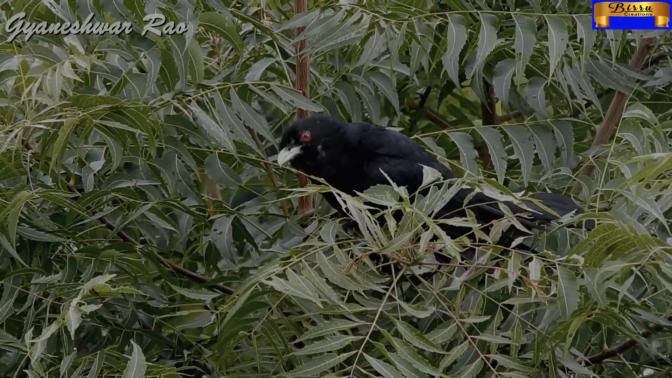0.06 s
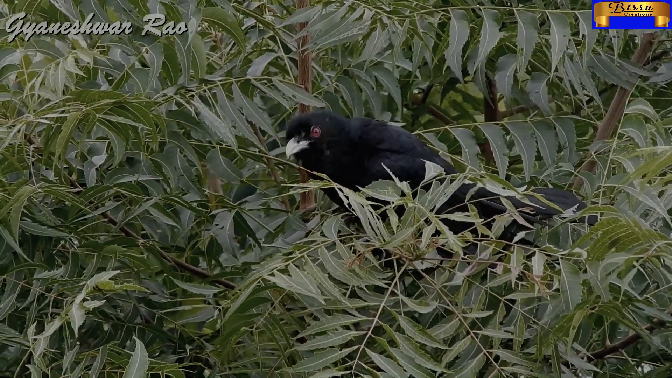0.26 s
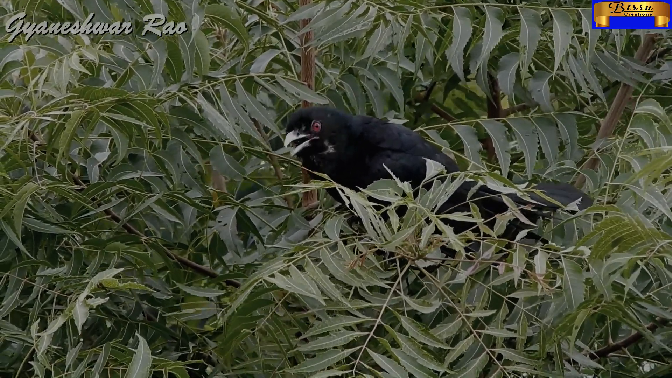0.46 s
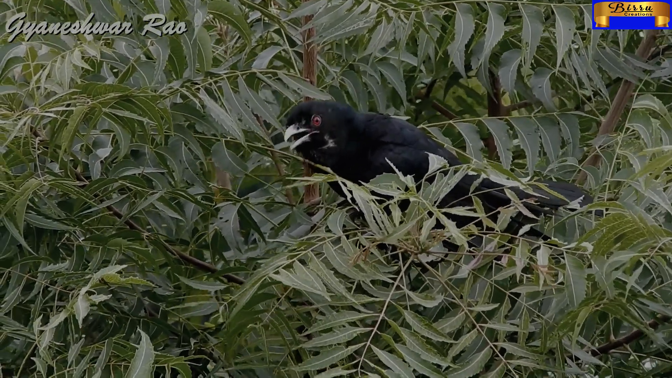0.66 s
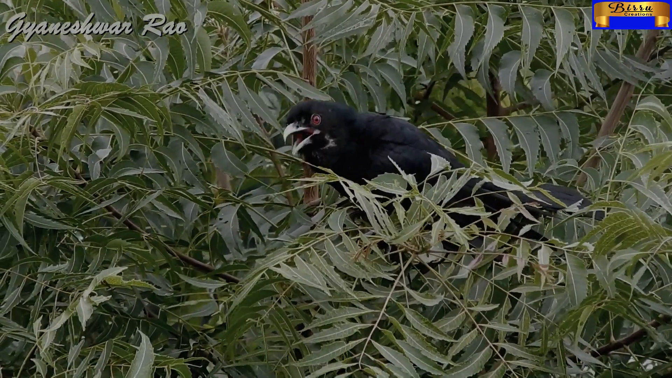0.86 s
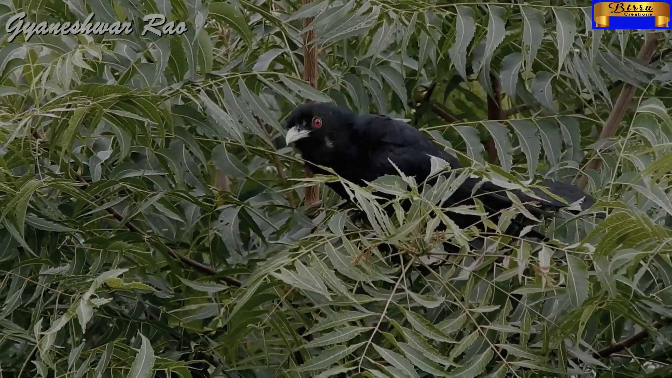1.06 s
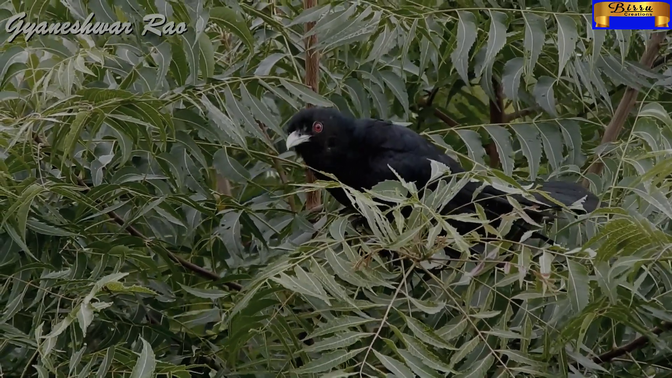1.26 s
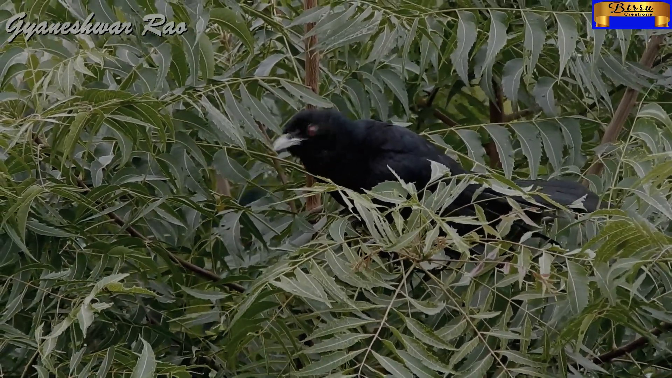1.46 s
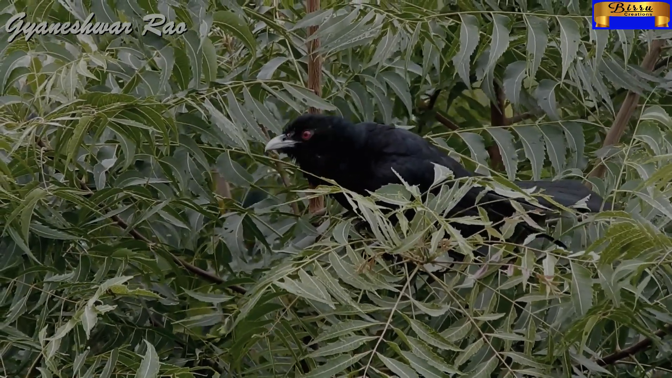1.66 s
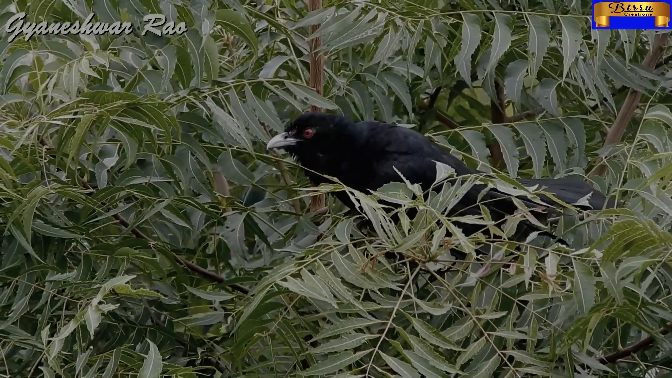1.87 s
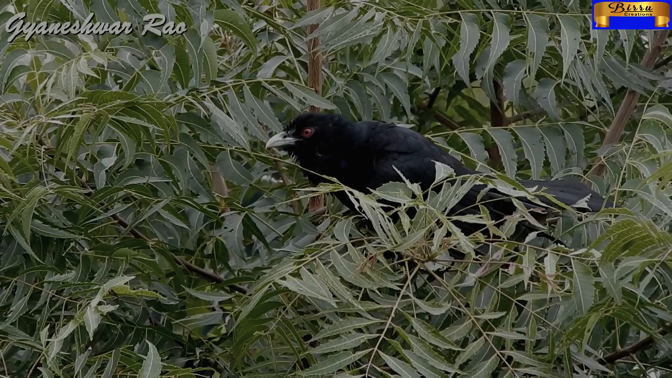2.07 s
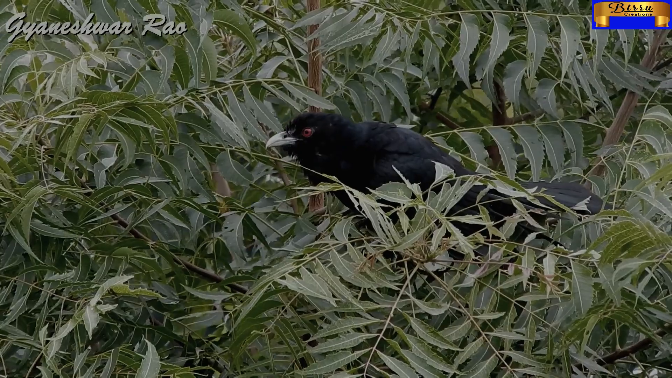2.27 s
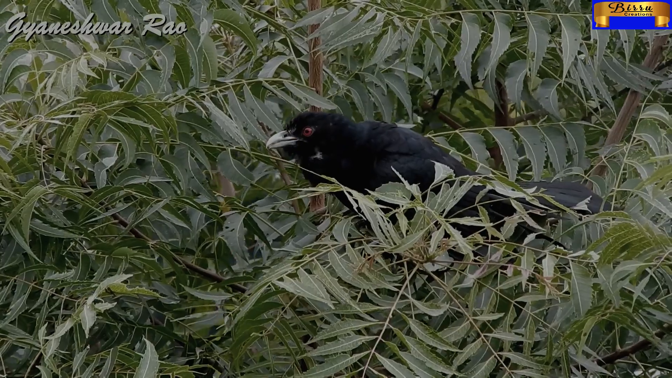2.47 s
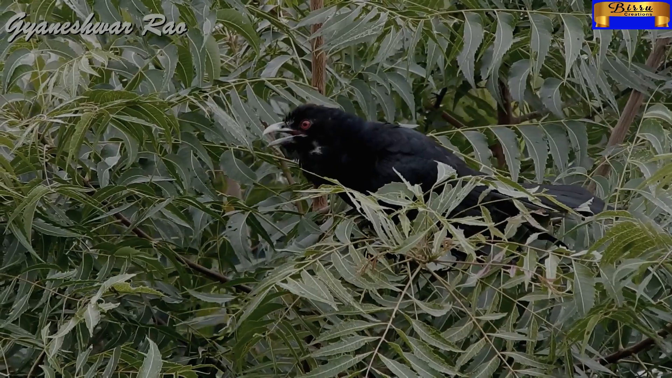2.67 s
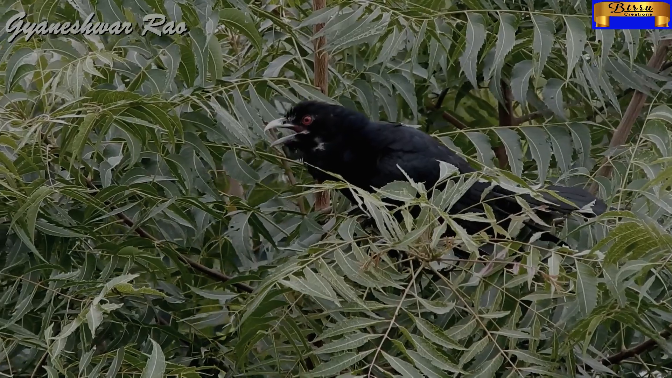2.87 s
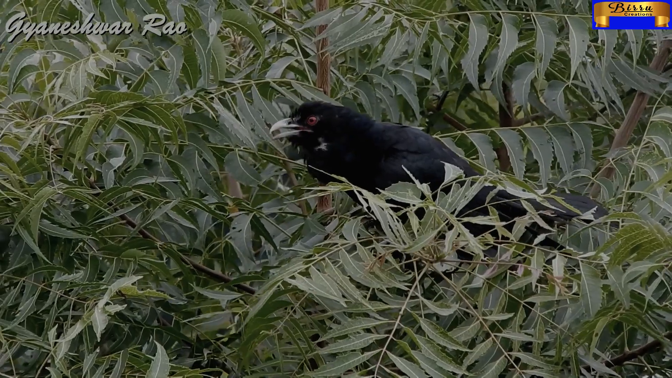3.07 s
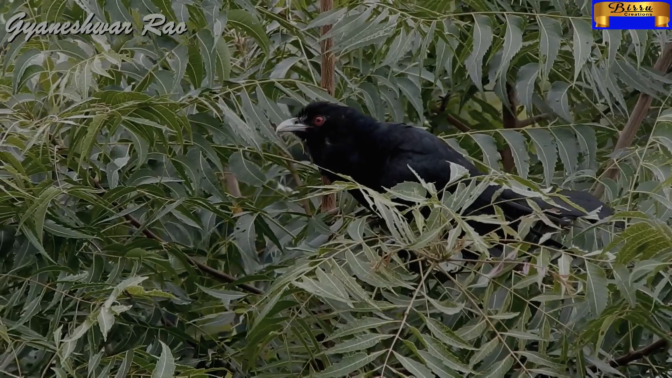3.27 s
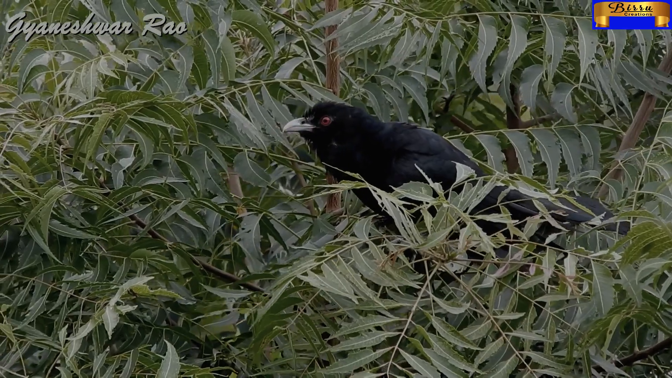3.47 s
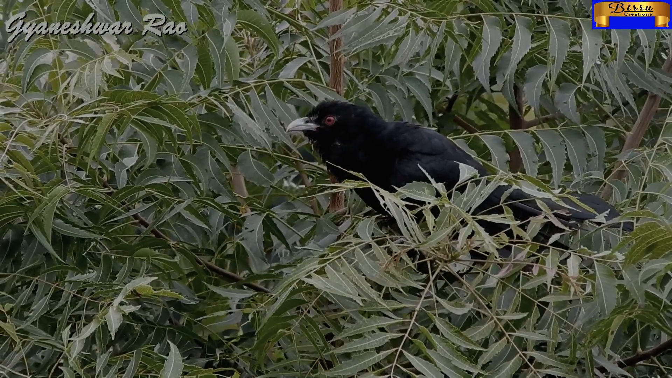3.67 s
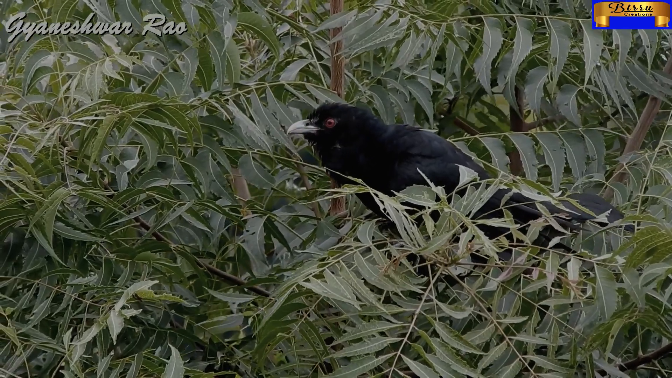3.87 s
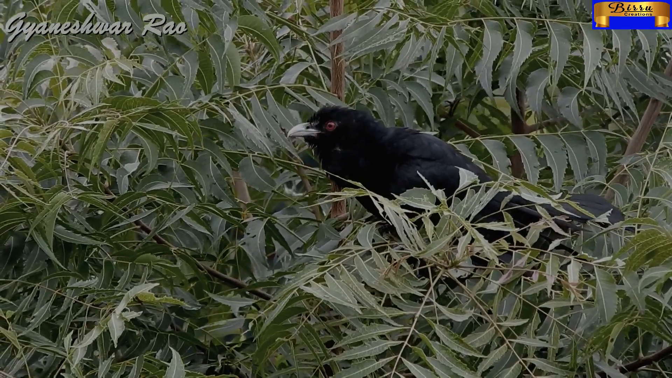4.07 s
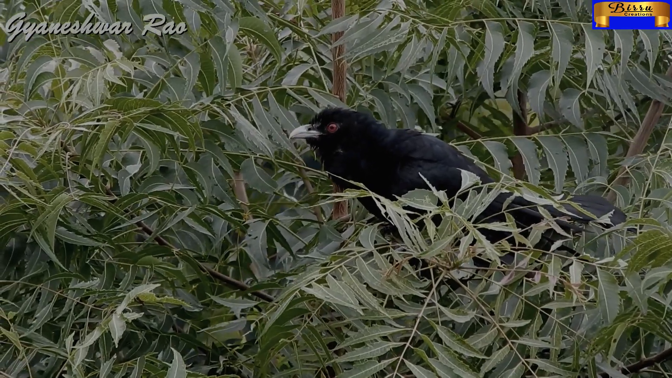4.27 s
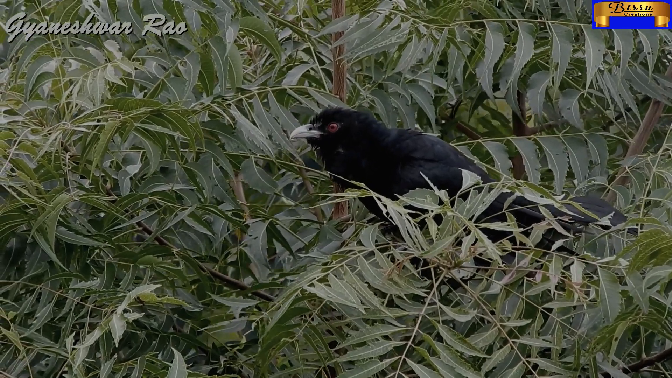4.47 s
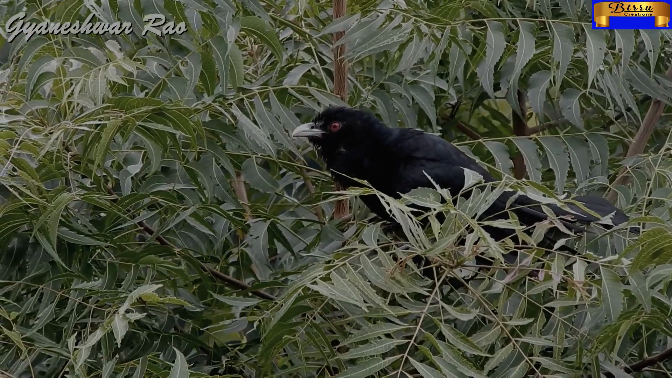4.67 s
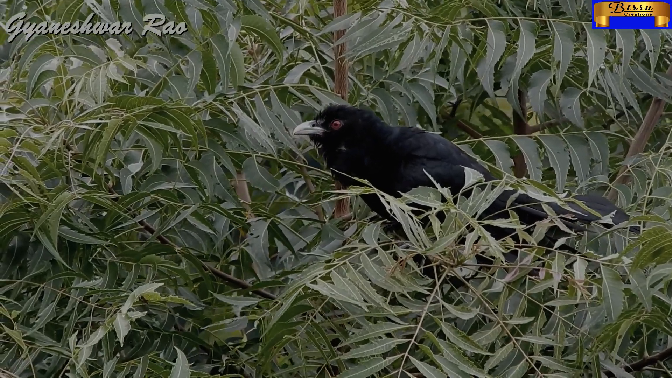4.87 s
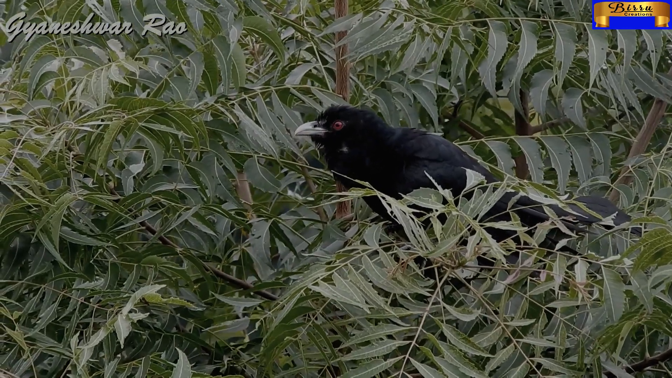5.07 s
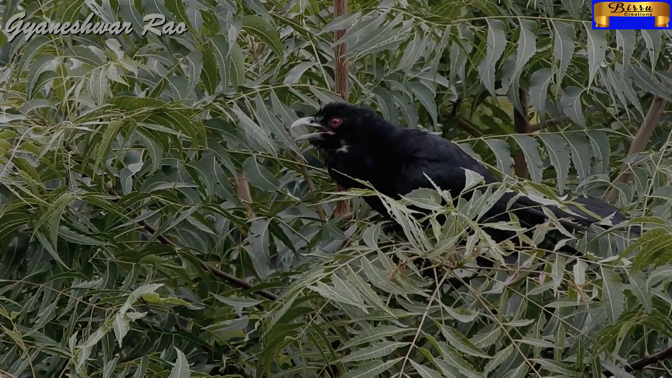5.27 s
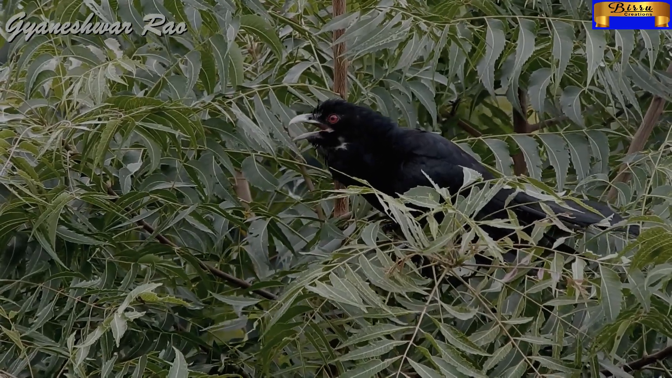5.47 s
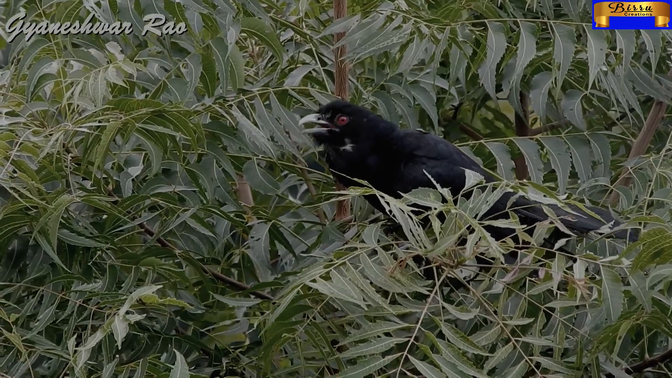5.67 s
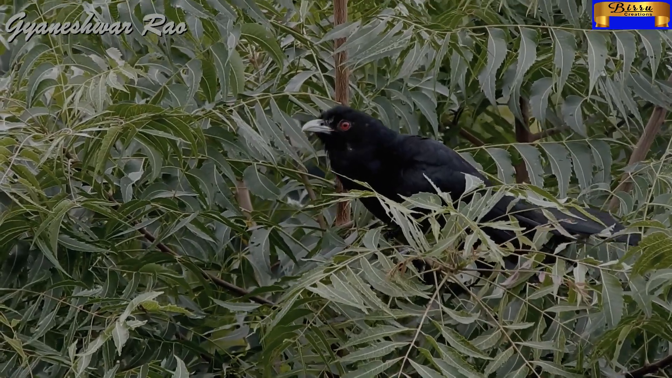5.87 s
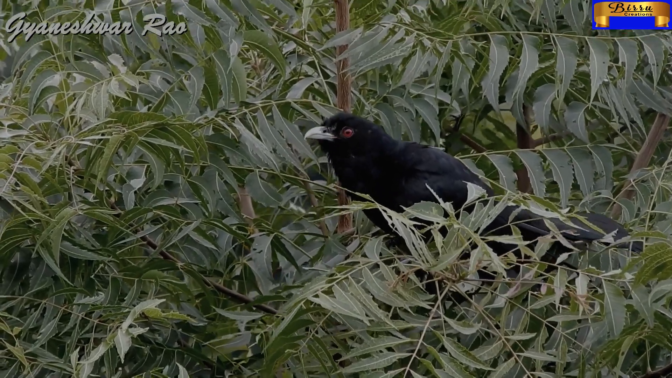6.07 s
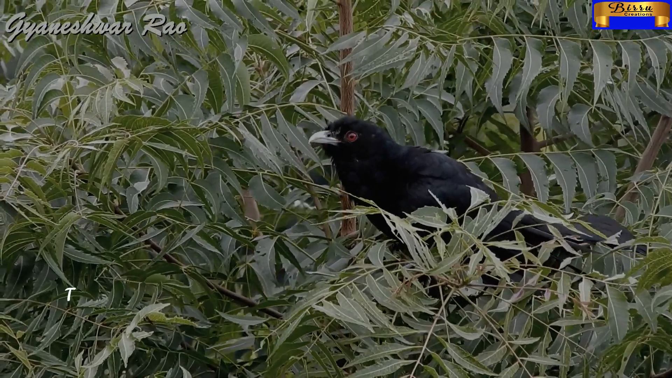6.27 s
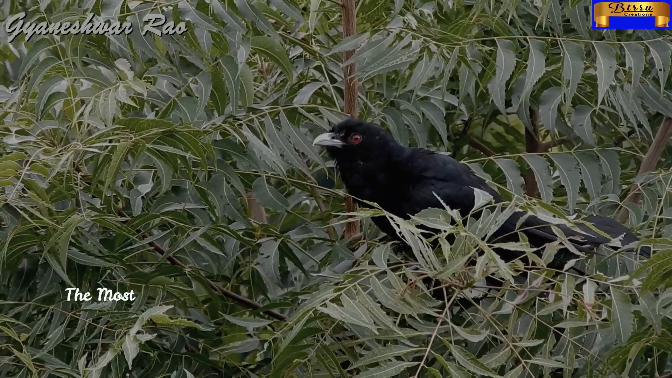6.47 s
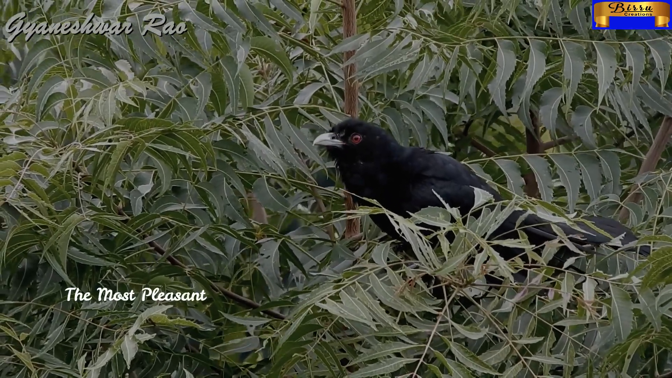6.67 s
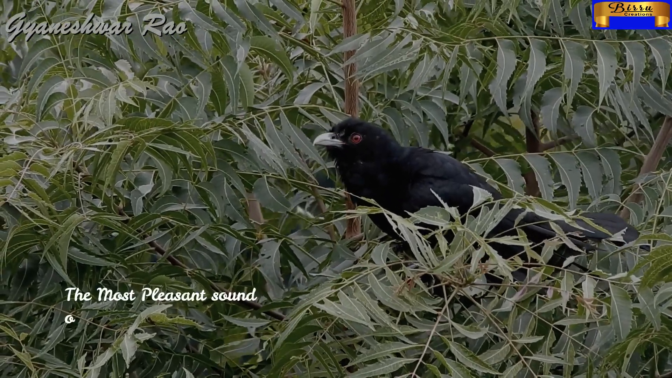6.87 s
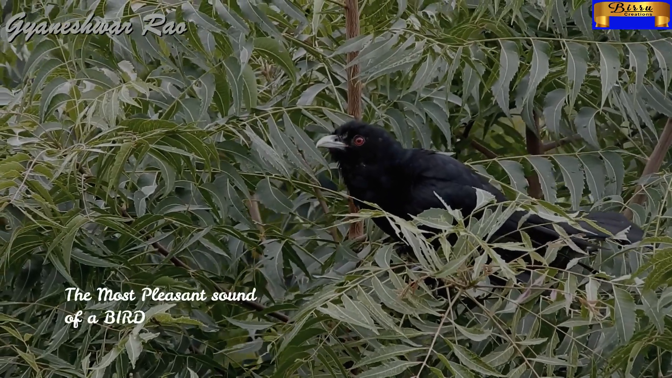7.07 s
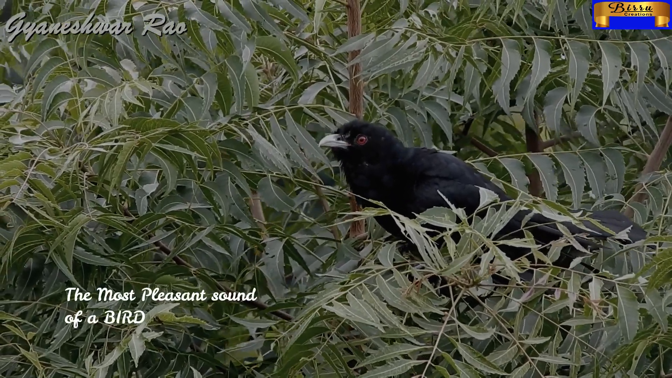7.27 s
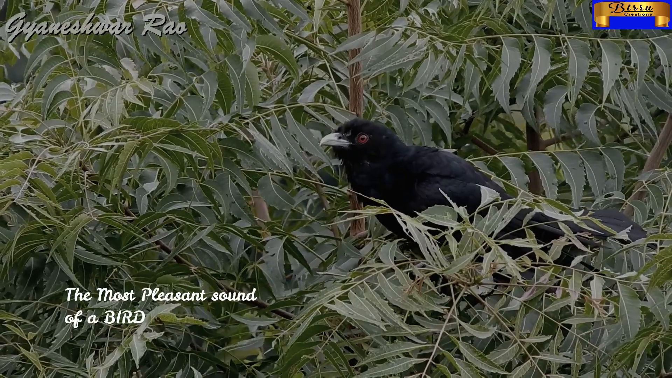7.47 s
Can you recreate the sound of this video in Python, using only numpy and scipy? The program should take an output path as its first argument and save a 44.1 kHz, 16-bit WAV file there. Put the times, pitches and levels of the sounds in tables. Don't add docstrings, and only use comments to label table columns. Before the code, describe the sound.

A quiet outdoor grove with a low, gently swelling hum of distant traffic. Faint rough crow caws and small dry-leaf crackles begin at once. At 0.45 s a nearby koel gives a loud, nearly pure whistle around 1.2 kHz, rising to 1.4 kHz and falling steeply by 1.05 s, with a short diffuse tree echo. A soft dove purr and quick high chirps follow around 1.1 to 2.5 s. The second similar whistle comes at 2.6 to 3.2 s. Then rustles, far flock chatter, thin rising chirps mostly left, and a twig snap near 3.3 s; snaps cluster at 4.2 to 4.4 s, sharpest at 4.4, with more near 4.9. A barely audible distant horn lingers from 4.5 to 5.4 s. The third whistle sounds at 5.25 to 5.8 s. Afterwards only faint caws, purring, chirps, leaf crackle and a clear snap near 7.05 s remain until about 7.5 s.

```python
import sys
import numpy as np
from scipy import signal
from scipy.fft import rfft, irfft, next_fast_len
from scipy.io import wavfile
from scipy.ndimage import uniform_filter1d

SR = 44100
rng = np.random.default_rng(int(sys.argv[2]) if len(sys.argv) > 2 else 0)


def store_wav(level_fs):
    pcm = np.round(np.clip(np.atleast_2d(level_fs), -1, 1) * 32767)
    wavfile.write(sys.argv[1], SR, pcm.T.astype(np.int16))


N = 331632

# f/Hz, t60/s
GROVE_DECAY = [(300, 0.5), (1000, 0.47), (2500, 0.18), (6000, 0.42), (12000, 0.3)]
# f/Hz, level/dB per Hz
HUM_SPECTRUM = [(12, -42), (20, -18.5), (85, 6), (519, -8), (767, -2.5), (1130, -9.5), (1980, -34.5),
                (2540, -13.5), (4950, -14.5), (6910, -48.5), (8880, -23.5), (9930, -47.5), (15500, -38)]
HUM_DB = -62.5
# f/Hz, likeness/0-1
HUM_LIKENESS = [(60, .975), (180, 0.96), (550, 0.95), (1650, .9), (4970, 0.78), (15000, 0)]
# t/s, level/dB
GUSTS = [(.65, 4.5), (1.301, 0), (2.399, 4.5), (2.681, 11), (3.45, 6.5), (4.03, 9), (4.6, 1.5), (5.399, 5),
         (6.1, -1.5), (7.198, 4)]
# t/s, length/s, effort/dB, throat resonance f/Hz
CAWS = [(0.0, .07, -40, 1866), (.4, .05, -53.5, 1870), (.57, .08, -33, 1513), (.7, .24, -44, 1548),
        (1.14, .03, -49, 1907), (1.305, 0.12, -42.5, 1866), (1.67, 0.07, -53.5, 1797),
        (2.235, .03, -54.5, 2176), (2.36, .07, -59.5, 1788), (2.63, .05, -44.5, 1536),
        (2.78, .03, -43, 1503), (2.88, .15, -44.5, 1433), (3.05, .18, -54, 1538), (3.285, .08, -46.5, 1990),
        (3.82, .12, -49, 1920), (4.14, .12, -48.5, 1994), (4.42, .2, -54.5, 1831), (5.07, .15, -45.5, 1790),
        (5.25, .12, -55, 1684), (5.41, .05, -39.5, 1454), (5.63, .07, -42.5, 1451),
        (5.96, .08, -50.5, 1927), (6.12, .16, -54, 2028), (6.45, .18, -68, 1950), (6.64, .22, -54.5, 1832),
        (7.04, .08, -45.5, 2027), (7.15, .12, -54.5, 1946), (7.5, .05, -54.5, 2058)]
# t/s, length/s, level/dB, dryness on the treble/dB
CRUNCHES = [(0.0, 0.059, -65, 13.5), (.42, 0.057, -71, -15), (.49, 0.09, -61.5, -6.5),
            (.58, 0.18, -62.5, -22.5), (.9, 0.11, -58, -5), (1.08, 0.1, -56, 4.5),
            (1.25, 0.35, -74.5, -5.5), (1.66, 0.13, -71, 13.5), (1.8, 0.384, -82, -20),
            (2.232, 0.057, -63.5, 2), (2.55, 0.06, -63.5, -6.5), (2.625, .015, -62.5, 12.5),
            (2.75, 0.031, -58.5, -1.5), (2.85, 0.33, -65.5, -2), (3.285, 0.012, -54.5, -1.5),
            (3.6, 0.21, -74, 0.5), (3.83, 0.044, -61.5, 0.5), (4.0, 0.22, -76.5, -8),
            (4.312, 0.09, -53.5, 1), (4.5, 0.97, -75.5, -25), (4.83, 0.06, -66, 7),
            (4.886, 0.052, -60, 17.5), (5.245, 0.03, -61, 10.5), (5.41, 0.066, -56, 0.5),
            (5.66, 0.11, -65.5, -20.5), (5.95, 0.018, -66.5, -26), (6.488, 0.058, -61.5, -0.5),
            (6.6, 0.13, -79.5, -27), (7.01, 0.043, -67.5, -18.5), (7.052, 0.031, -56.5, -43),
            (7.36, 0.019, -73, -14), (7.48, .05, -62, 0)]
# f/Hz, level/dB per Hz
LEAF_SPECTRUM = [(300, -46.5), (600, -8), (1100, -8), (1900, -1.5), (3200, -1), (5000, -7.5), (8000, -17),
                 (10000, -22.5), (12500, -19.5), (15500, -30.5)]
# t/s, pitch f/Hz, effort level/dB
KOEL_CALLS = [
    [(.452, 1293, -29), (.525, 1197, -26), (.65, 1198, -25.5), (.79, 1367, -20), (.85, 1413, -18),
     (.905, 1368, -22), (.965, 1170, -22.5), (1.0, 1031, -34), (1.06, 640, -42.5)],
    [(2.615, 1347, -28), (2.668, 1276, -26.5), (2.755, 1255, -28), (2.92, 1406, -16), (2.985, 1439, -17.5),
     (3.035, 1388, -22.5), (3.1, 1176, -24.5), (3.136, 1023, -36.5), (3.19, 631.6, -39)],
    [(5.238, 1330, -30), (5.32, 1288, -26), (5.41, 1288, -22), (5.475, 1352, -22.5), (5.585, 1435, -17),
     (5.64, 1407, -21), (5.715, 1170, -25), (5.75, 1025, -35.5), (5.794, 620, -41.5)],
]
# share of call/0-1, lift from the third
# up/dB
BEAK = [(0, -8.5), (.25, -13), (.45, -2), (.62, 3), (.71, 3.5), (.79, -7.5), (.92, 10), (1, -13.5)]
# f/Hz, level/dB
THROAT = [(2000, -29), (2800, -32.5), (3800, -44.5), (4250, -38.5), (5000, -44), (5700, -16), (7000, -20.5),
          (8550, -20), (8950, -34.5), (9450, -14.5), (10000, -13.5), (10650, -8.5), (11300, -22.5),
          (12500, -19), (14000, -22), (15000, -34.5), (15700, -43), (16600, -79.5)]
WIDE_BEAK = [
    [-0.85, -2.5, -7, -2.5, 3, -2, 1.5, -23, -1.5, -11.5, -18, -23, -22],
    [0.18, -8.5, -7, -5.5, 0.18, -0.17, 2, -26, -7, -10, -12, -15, -11.5],
    [-1.3, -6, -8.5, -5.5, 0.1, 0, -3.5, -34, -4, -14, -21.5, -15.5, -14.5],
]
SHUT_BEAK = [
    [2.5, 0.93, 0.92, 1.5, 6.5, -2, -3, -3, 1, -6.5, 1, -8.5, -10],
    [-3, 0.1, 0.11, 2.5, 0.1, 2, -2, -2.5, 6, -14.5, -10, -6, -10],
    [1.5, 0.13, 0.09, -7, 8.9, 9.5, -7, 6, -5, -6.5, -7, -10, -10],
]
# second overtone level/dB, sixth and eighth overtone level/dB
PRESSED_START = [(1.2, 1.5), (15.5, 13), (16, 4.3)]
# f/Hz, left-right level/dB
EARS = [(1300, 3), (2500, 1.5), (2850, -6.5), (3800, -7.5), (4270, 15), (5100, 5), (6400, 2), (7100, 5.5),
        (8550, 6.5), (9800, 6.5), (11500, -5), (12800, 2), (14200, -2)]
# delay t/s, level/dB
FIRST_ECHOES = [
    [(.0031, -16.5), (.011, -28), (.024, -18.5), (.041, -21.5), (.068, -25.5), (.097, -29)],
    [(.0043, -26), (.014, -17), (.029, -21.5), (.046, -23.5), (.074, -26.5), (.105, -30.5)],
]
# t/s, length/s, effort level/dB, first f/Hz, last f/Hz
PURRS = [(1.104, 0.42, -59.5, 823, 828.6), (1.548, 0.29, -60, 805, 772), (2.506, 0.073, -54, 791, 781),
         (2.667, 0.16, -57.5, 780, 770), (3.193, 0.29, -64.5, 760, 802), (4.096, 0.68, -66.5, 764, 741),
         (4.549, 1, -59, 744.5, 680), (5.454, 0.61, -65.5, 682, 731), (5.849, 0.26, -65.5, 776, 747),
         (6.096, 0.45, -62, 717, 688), (7.01, 0.46, -64, 790, 702.3)]
# t/s, length/s, level/dB, middle f/Hz
FLOCK_SPELLS = [(1.28, 0.14, -63.5, 4385), (2.15, 0.17, -66, 4270), (2.42, 0.1, -61.5, 4265),
                (3.55, 0.02, -73.5, 4566), (3.77, 0.11, -60.5, 4170), (3.98, 0.035, -79, 4340)]
# t/s, peak level/dB, ring f/Hz, left-right pan/dB
TWIGS = [(1.304, -38, 2120, 11), (2.231, -39.5, 2070, -9), (3.2907, -29.5, 2300, 9),
         (3.5838, -47.5, 3620, 7), (3.8612, -50.5, 2050, 5), (4.2115, -47, 2100, 8), (4.222, -41, 1840, 6),
         (4.234, -32.5, 1880, 15), (4.2405, -38, 2080, 21), (4.3125, -34.5, 2070, 11),
         (4.345, -37, 2300, 6), (4.361, -39, 1835, 5), (4.3305, -37.5, 2270, 5), (4.3998, -21, 3513, 4),
         (4.89, -27.5, 2904, 6), (4.9399, -35, 2830, 13), (4.568, -64, 11700, -4), (4.685, -52, 12480, -5),
         (5.831, -53, 9000, 14), (5.8722, -49, 7050, 21), (5.9705, -38, 2065, 9), (6.4868, -45, 2950, 15),
         (6.515, -38, 3170, 9), (7.0602, -26.5, 2033, 15), (7.085, -39, 2000, 10), (7.11, -43.5, 2000, 9),
         (7.165, -40, 1900, 5), (7.385, -43.5, 4150, 7.5), (7.49, -42, 2990, 14), (7.4776, -41.5, 2230, 3)]
# t/s, length/s, start f/Hz, end f/Hz, level/dB
CHIRPS = [ (1.409, 0.044, 4350, 7800, -52.5), (1.445, 0.034, 7890, 5350, -45),
          (2.307, 0.1, 1754, 1736, -76), (2.422, 0.038, 5500, 7900, -51.5), (2.44, 0.038, 7995, 5900, -46),
          (3.447, .02, 4520, 3790, -61.5), (3.487, 0.072, 3930, 5640, -55.5),
          (3.768, 0.05, 4120, 5670, -52.5), (3.983, 0.019, 4360, 4090, -54.5),
          (4.018, 0.084, 3730, 6150, -52), (4.331, 0.042, 4880, 6900, -59),
          (4.553, 0.11, 3900, 5980, -62.5), (4.665, 0.033, 5800, 7600, -46),
          (4.683, 0.035, 7630, 5590, -42), (4.827, 0.12, 4480, 6300, -55), (5.128, 0.089, 3915, 6200, -57),
          (6.622, 0.2, 7560, 6200, -66.5), (6.671, 0.12, 4490, 6380, -53.5),
          (6.884, 0.069, 2720, 2660, -59), (7.297, 0.067, 2537, 2580, -61.5),
          (7.391, 0.13, 2430, 1774, -59)]
# t/s, length/s, f/Hz, level/dB
HORN = (4.5, .95, 468, -72)


def gain_of(db):
    return 10 ** (np.asarray(db) / 20)


def evened(x):
    return x / np.sqrt(np.mean(x ** 2) + 1e-20)


def read(points, hz):
    f, value = np.transpose(points)
    return np.interp(np.log(hz + 1), np.log(f + 1), value)


def columns(rows, t):
    s, *rest = np.transpose(rows)
    return [np.interp(t, s, c) for c in rest]


def add(mix, s, sound):
    part = mix[..., round(s * SR):][..., :sound.shape[-1]]
    part += sound[..., :part.shape[-1]]


def panned(x, db):
    return x * gain_of([[db / 2], [-db / 2]])


def smoothed_twice(x, size):
    return uniform_filter1d(uniform_filter1d(x, size), size)


def wander(count, size):
    return evened(smoothed_twice(rng.standard_normal(count), size))


def resonate(x, hz, width):
    turn = np.exp(2j * np.pi * np.cumsum(hz * np.ones(len(x))) / SR)
    r = np.exp(-np.pi * width / SR)
    return 2 * (turn * signal.lfilter([1 - r], [1, -r], x / turn + 1e-18)).real


def coloured(x, points):
    size = next_fast_len(N)
    gain = gain_of(read(points, np.fft.rfftfreq(size, 1 / SR)))
    return irfft(rfft(x, size) * gain, size)[..., :N]


def banded(x, depth_db):
    hz, t, z = signal.stft(x, SR, nperseg=256)
    field = rng.standard_normal((len(t), len(hz))).T
    field = evened(uniform_filter1d(uniform_filter1d(field, size=6, axis=0), size=40, axis=1))
    return signal.istft(z * gain_of(depth_db * field), SR, nperseg=256)[1][:, :N]


def bursts(rows, t, rise_db, fall_db):
    s, length, db, value = np.transpose(rows)[:, :, None]
    at = t[::64]
    early, late = np.maximum(s - at, 0), np.maximum(at - s - length, 0)
    each = gain_of(db - rise_db * early - fall_db * late)
    total = each.sum(axis=0)
    level_db = np.interp(t, at, 20 * np.log10(total))
    return level_db, np.interp(t, at, (each * value).sum(axis=0) / total)


def grove(x):
    taps = np.zeros((2, SR // 2))
    at = np.arange(400, SR // 2 - 20, 20)
    at = at + rng.integers(0, 20, (2, len(at)))
    np.put_along_axis(taps, at, rng.choice([-1., 1.], at.shape), 1)
    hz, t, z = signal.stft(taps, SR, nperseg=256)
    decay_db = -60 * t / read(GROVE_DECAY, hz)[:, None]
    tail = signal.istft(z * gain_of(decay_db), SR, nperseg=256)[1]
    tail[1] = 0.61 * tail[0] + 0.73 * tail[1]
    return signal.fftconvolve(x, tail / np.linalg.norm(tail[0]), axes=1)[:, :N]


def hum():
    frames, hz = N // 256 + 5, np.fft.rfftfreq(1024, 1 / SR)
    a, b, c, d, patches = rng.standard_normal((frames, 513, 5)).T
    patches = evened(uniform_filter1d(uniform_filter1d(patches, size=10, axis=0), size=20, axis=1))
    same = np.clip(read(HUM_LIKENESS, hz), -1, 1)[:, None]
    left = a + 1j * b
    right = same * left + np.sqrt(1 - same ** 2) * (c + 1j * d)
    drift_db = 1.8 * patches + 0.72 * wander(frames, size=40)
    z = np.array([left, right]) * gain_of(read(HUM_SPECTRUM, hz)[:, None] + drift_db)
    t, gust_s = np.arange(frames) * 256 / SR, 0.13
    gust_db = sum(db * np.exp(-((t - s) / gust_s) ** 2) for s, db in GUSTS)
    z *= gain_of((gust_db - gust_db.mean()) / (1 + (hz[:, None] / 700) ** 2))
    rumble = evened(signal.istft(z, nperseg=1024, noverlap=768)[1][:, :N])
    return panned(gain_of(HUM_DB) * rumble, 1.7)


def crows(t):
    effort_db, hz = bursts(CAWS, t, rise_db=349.5, fall_db=215.5)
    hz = hz * (1 + .035 * wander(N, size=1500))
    turns = np.cumsum(80 * gain_of(2.3 * wander(N, size=400))) / SR
    puff = np.exp(-(turns % 1) / .35) * gain_of(1.8 * wander(N, size=300))
    pulses = np.diff(np.floor(turns), prepend=0) * gain_of(2.5 * rng.standard_normal(N))
    air = evened((.3 + puff) * rng.standard_normal(N)) + .15 * evened(pulses)
    throat = resonate(resonate(air, hz, 260), hz, 380)
    wide_throat = resonate(resonate(air, 0.98 * hz, 620), 0.79 * hz, 500)
    pipe = resonate(resonate(air, .78 * hz, 180), .78 * hz, 260)
    caw = throat + gain_of(-9) * wide_throat + gain_of(-12) * pipe
    caw = gain_of(effort_db) * evened(caw)
    return panned(caw, 1.0) * 0.62 + gain_of(-7.5) * grove(caw[None])


def leaves(t):
    crunch_db, dry_db = bursts(CRUNCHES, t, rise_db=650, fall_db=249)
    size_db = 1.4 * np.minimum(rng.exponential(1, N), 5)
    cracks = rng.standard_normal((2, N)) * (rng.random(N) < 3000 / SR) * gain_of(size_db)
    cracks = cracks + 0.15 * rng.standard_normal((2, N))
    cracks[1] = .55 * cracks[0] + .83 * cracks[1]
    body = evened(banded(coloured(cracks, LEAF_SPECTRUM), depth_db=2.5))
    heap_hz = 3200 * gain_of(3 * wander(N, size=4000))
    body = body + .25 * resonate(body[0], heap_hz, 900)
    treble = signal.sosfilt(signal.butter(4, 5000, "high", fs=SR, output="sos"), body)
    crunch = gain_of(crunch_db + 10.5) * (body + (gain_of(dry_db) - 1) * treble)
    return panned(crunch, 5.1) * 0.58 + gain_of(-9.0) * grove(crunch)


def whistle(rows, wides_db, shuts_db, pressed_db):
    t = np.arange(rows[0][0], rows[-1][0], 1 / SR)
    since, falling = t - t[0], t > t.mean()
    hz, effort_db = columns(rows, t)
    beak_db, = columns(BEAK, np.linspace(0, 1, len(t)))
    for _ in range(2):
        hz = uniform_filter1d(hz, size=1100, mode="nearest")
    hz = np.maximum(hz, 815)
    hz = hz * (1 - .1 * np.exp(-since / .011))
    wide = np.clip(2.5 + beak_db / 3.2, 0, 1)
    hoarse = .0018 * (1 - wide + (hz < 1300) * falling)
    tremble = (.0021 + hoarse) * wander(len(t), size=150)
    turn = 2 * np.pi * np.cumsum(hz * (1 + tremble)) / SR
    accent = np.exp(-((since - .032) / .026) ** 2)
    beat = 2 * np.pi * 375 * t
    closing = np.clip((1185 - hz) / 45, 0, 6) * falling
    low_end = np.clip((1340 - hz) / 80, 0, 1) * falling

    overtones = np.zeros(len(t))
    for k, (wide_db, shut_db) in enumerate(zip(wides_db, shuts_db), 2):
        press_db = pressed_db[0] if k == 2 else pressed_db[1] if k in (6, 8) else 3.0
        open_db = beak_db * (k > 2) + wide * wide_db + (1 - wide) * shut_db + accent * press_db
        open_db = open_db + 2.5 * wander(len(t), size=500)
        open_db = open_db - closing * (2.3 if k in (5, 6) else 3.0) + 8 * (k > 10) * low_end
        side = gain_of(-23) * wide ** 2 * np.sin(k * turn + np.sign(7 - k) * beat)
        overtones += gain_of(read(THROAT, k * hz) + open_db) * (np.sin(k * turn + k * k) + side)

    air = .065 + .9 * np.exp(-since / .016) + .16 * closing
    fundamental = np.sin(turn) * (1 + (.01 + .006 * closing) * wander(len(t), size=60))
    voice = fundamental + overtones * (1 + air * wander(len(t), size=36))
    flutter_db = (.5 + .4 * closing) * wander(len(t), size=300)
    flutter_db -= 10 * np.exp(-((hz - 1085) / 40) ** 2) * falling
    voice = voice * np.minimum((t[-1] - t) / .03, 1)
    voice = voice * np.minimum(since / .026, 1) ** 1.5
    return np.sqrt(2) * gain_of(uniform_filter1d(effort_db, size=200) + flutter_db) * voice


def koel():
    calls = np.zeros(N)
    for rows, *colour in zip(KOEL_CALLS, WIDE_BEAK, SHUT_BEAK, PRESSED_START):
        add(calls, rows[0][0], whistle(rows, *colour))
    ears = np.array([coloured(calls, [(hz, sign * db / 2) for hz, db in EARS]) for sign in (1, -1)])
    lag = 0.22
    ears[1] = (1 - lag) * ears[1] + lag * np.roll(ears[1], 2)
    for ear, echoes in zip(ears, FIRST_ECHOES):
        for s, db in echoes:
            add(ear, s, gain_of(db) * calls)
    brighter = signal.lfilter([1, -.45], 1, calls)
    return ears + gain_of(-9.5) * grove(brighter[None])


def dove():
    coos = np.zeros(N)
    for s, length, db, first_hz, last_hz in PURRS:
        t = np.arange(s, s + length, 1 / SR)
        u = (t - s) / length
        effort_db = db - 8 * abs(u - 0.6)
        hz = first_hz + (last_hz - first_hz) * u
        beats = np.cumsum(41 * gain_of(.5 * wander(len(t), size=3000))) / SR
        throb = (.78 + .22 * np.cos(2 * np.pi * beats)) ** 1.5
        breath = evened(resonate(rng.standard_normal(len(t)), hz, 90))
        tone = (np.sin(2 * np.pi * np.cumsum(hz) / SR) + breath) * throb
        add(coos, t[0], gain_of(effort_db) * evened(tone) * signal.windows.tukey(len(t), .1))
    return 1.04 * coos + gain_of(-9.5) * grove(coos[None])


def flock(t):
    level_db, hz = bursts(FLOCK_SPELLS, t, rise_db=143.5, fall_db=301)
    hz = hz * gain_of(0.85 * wander(N, size=1500))
    band = resonate(resonate(rng.standard_normal(N), hz, 640), hz, 900)
    chatter = gain_of(level_db) * evened(band)
    return .5 * panned(chatter, 11.0) + 1.5 * grove(chatter[None])


def twigs():
    t, snaps = np.arange(600) / SR, np.zeros((2, N))
    for s, db, hz, pan_db in TWIGS:
        ring = np.sin(2 * np.pi * hz * t) * gain_of(-60 * t / .009)
        crack = (hz / 9000) ** 2 * np.diff(rng.standard_normal(601)) * gain_of(-60 * t / .003)
        snap = (ring + crack) * np.minimum(t / .0009, 1)
        add(snaps, s, panned(gain_of(db) * snap, pan_db))
    return snaps + gain_of(-10) * grove(snaps)


def small_birds():
    song = np.zeros(N)
    for s, length, start_hz, end_hz, db in CHIRPS:
        bend = 1.4 if end_hz > start_hz else 0.81 if length > .05 else 0.86
        u = np.linspace(0, 1, round(length * SR))
        hz = start_hz + (end_hz - start_hz) * u ** bend
        hz = hz * (1 + .015 * wander(len(u), size=40))
        flicker = gain_of(3.5 * wander(len(u), size=120))
        shape = np.sin(np.pi * u) ** 0.29 * gain_of(db) * flicker
        add(song, s, np.sqrt(2) * shape * np.sin(2 * np.pi * np.cumsum(hz) / SR))
    return .75 * panned(song, 8.0) + gain_of(-9) * panned(grove(song[None]), 5.0)


def horn():
    s, length, hz, db = HORN
    t, tone = np.arange(round(length * SR)) / SR, np.zeros(N)
    level = gain_of(db + 7.6 * wander(len(t), size=2000)) * signal.windows.tukey(len(t), .2)
    add(tone, s, level * np.sin(2 * np.pi * hz * t))
    return tone


def scene():
    t = np.arange(N) / SR
    around = hum() + crows(t) + leaves(t) + dove() + flock(t) + twigs() + small_birds() + horn()
    around[1] = np.roll(around[1], 4)
    return koel() + around


def band_limit(x):
    return signal.sosfilt(signal.butter(12, 15700, fs=SR, output="sos"), x)


def record(dry):
    hz, t, z = signal.stft(dry, SR, nperseg=1024, noverlap=768)
    power = uniform_filter1d(uniform_filter1d(abs(z) ** 2, size=5, axis=1), size=6, axis=2)
    masker = power * np.where(hz[:, None] < 2000, .01, 1)
    blocks = rng.standard_normal((len(t) // 5 + 1, len(hz) // 12 + 1)).T
    blocks = blocks.repeat(12, axis=0).repeat(5, axis=1)[:len(hz), :len(t)]
    mask = uniform_filter1d(masker, size=90, axis=1) * gain_of(-34 + 18 * blocks)
    mask = mask + gain_of(-232)
    kept = np.where(hz[:, None] > 3000, power ** 2 / (power ** 2 + mask ** 2), 1)
    kept = kept * (hz[:, None] < 15680)
    mix = signal.istft(z * kept, SR, nperseg=1024, noverlap=768)[1][:, :N]
    return band_limit(mix)


dry = scene()
out = record(dry)
store_wav(out)
```